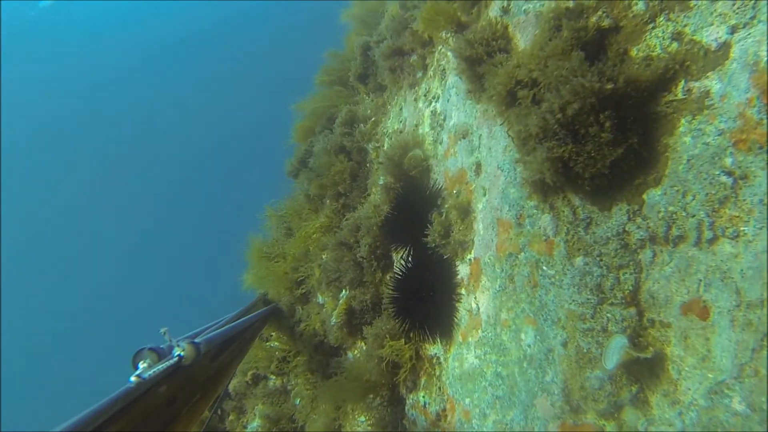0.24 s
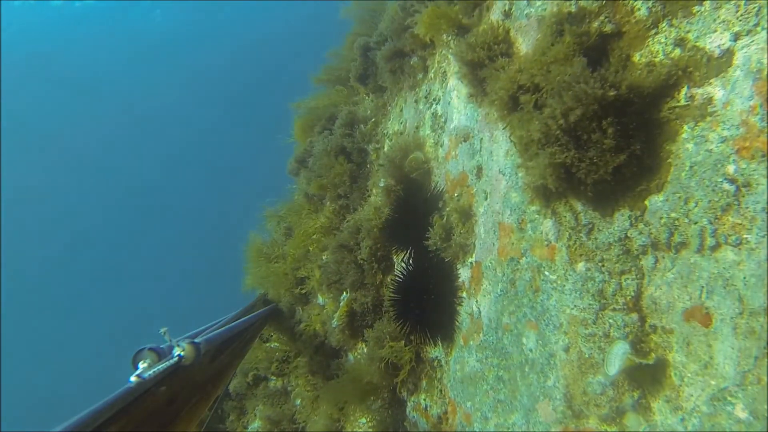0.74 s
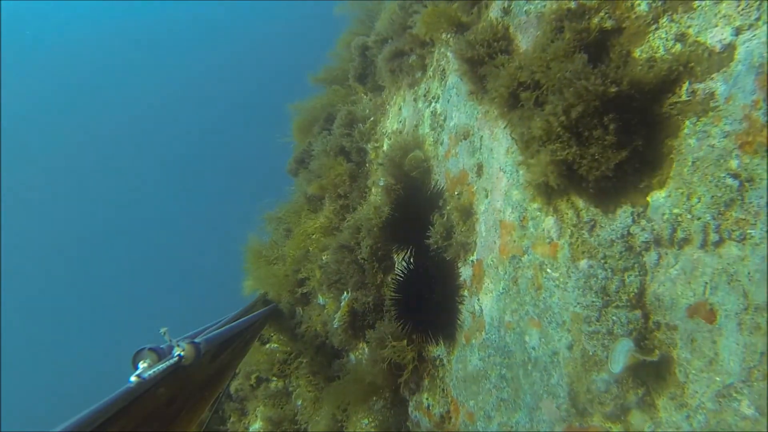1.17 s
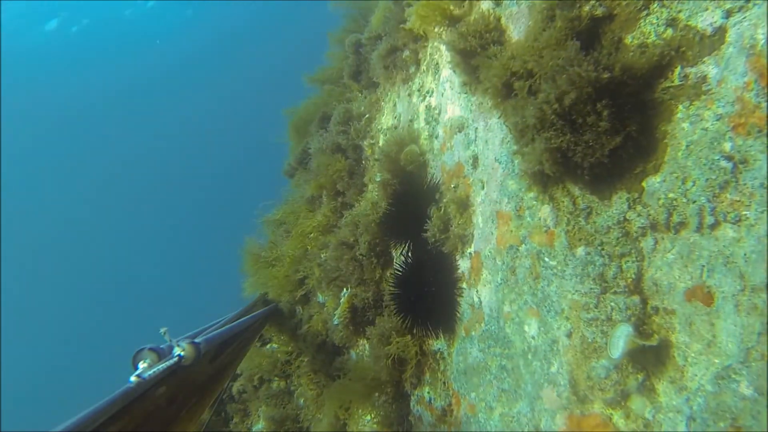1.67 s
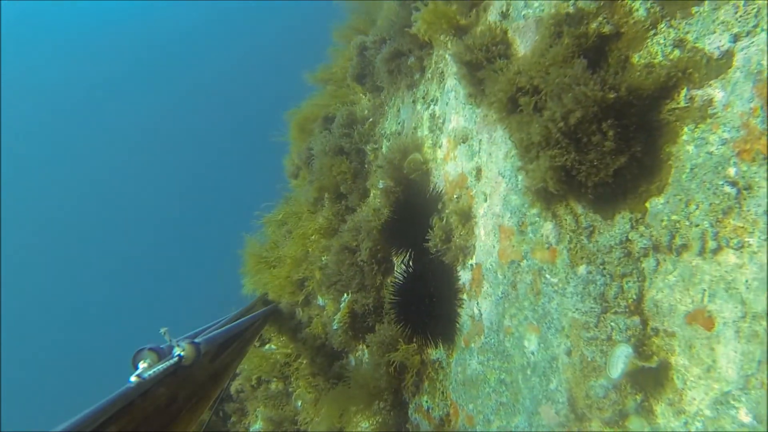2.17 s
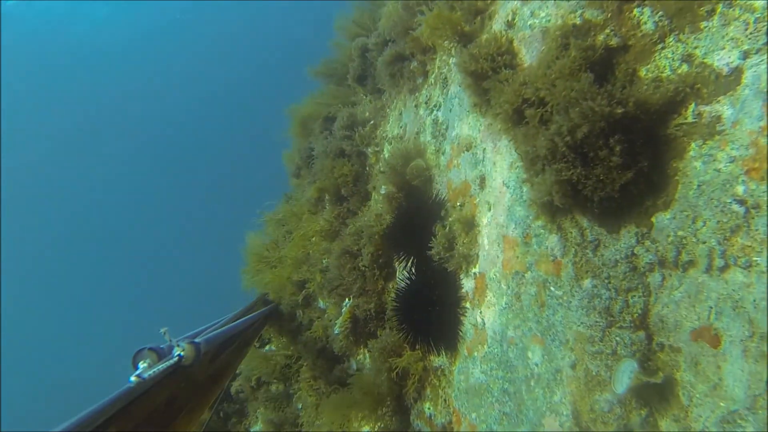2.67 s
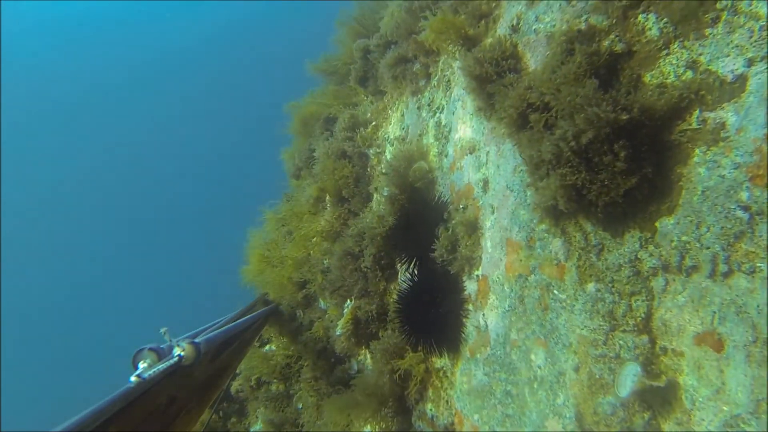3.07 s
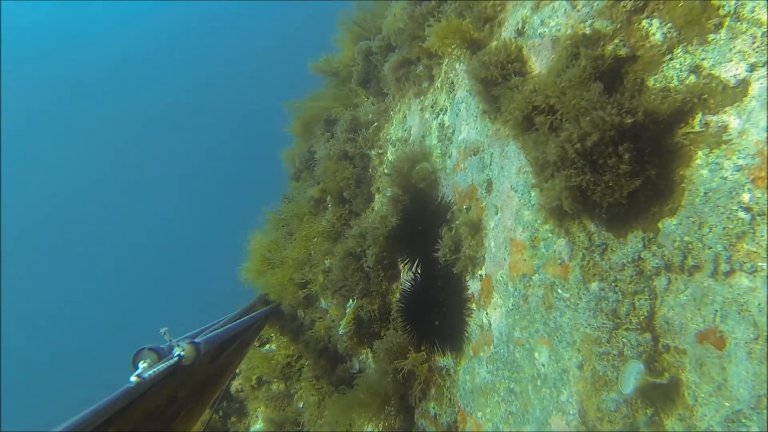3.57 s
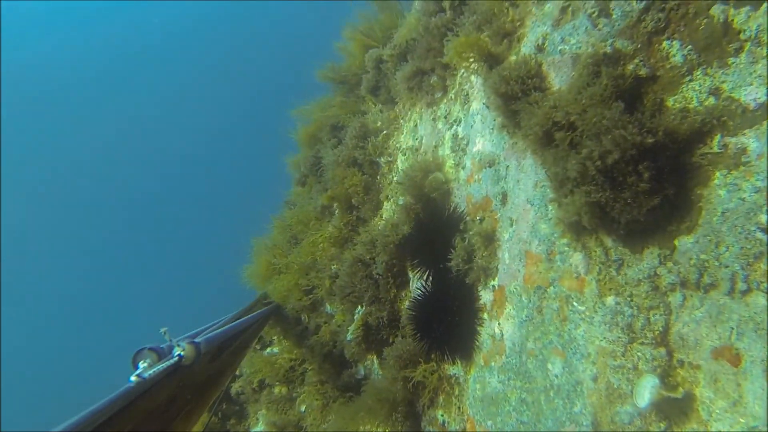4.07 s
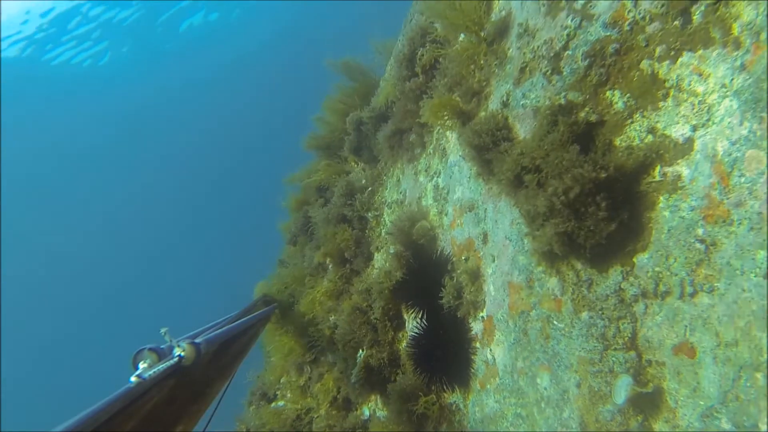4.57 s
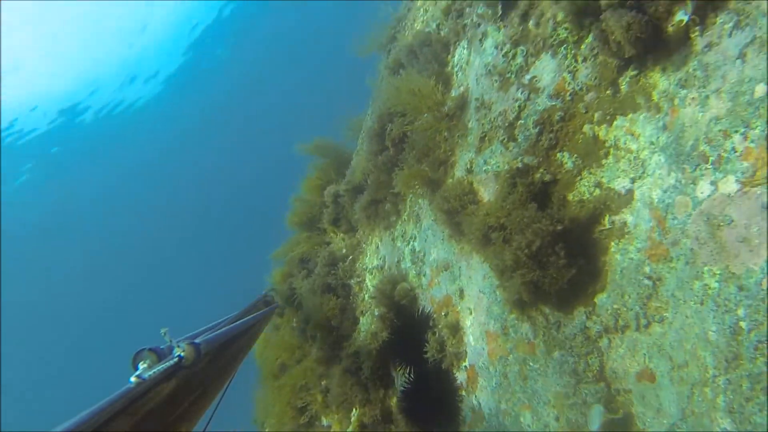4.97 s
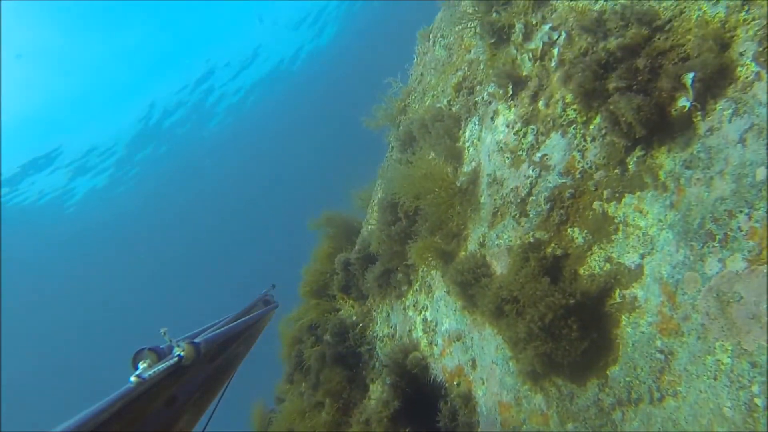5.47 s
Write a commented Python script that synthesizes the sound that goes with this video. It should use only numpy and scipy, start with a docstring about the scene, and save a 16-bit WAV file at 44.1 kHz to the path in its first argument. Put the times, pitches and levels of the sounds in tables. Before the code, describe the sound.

Steady dry crackle of snapping shrimp underwater, with two low thuds on a camera pole and soft deep rumbling as it sways.

```python
"""Snapping shrimp crackle near and far under the sea, the near ones ringing the sealed camera housing.
The housing sits on a long hand-held shaft before a rock wall: snaps are spikes with noise echoes off the rock.
The shaft sways as wandering low sines, and two knocks ring it as decaying sines with a scuff of noise.
Behind lie the sea's wash, filtered noise mostly below 800 Hz, and the microphone's hiss with a faint whistle."""
import sys
import numpy as np
from scipy import signal
from scipy.fft import rfft, irfft, next_fast_len
from scipy.io import wavfile
from scipy.ndimage import uniform_filter1d, map_coordinates

SR = 44100
rng = np.random.default_rng(int(sys.argv[2]) if len(sys.argv) > 2 else 0)


def generate_wav(signal):
    """Clip the signal to [-1, 1] and save it as 16-bit WAV at the path in sys.argv[1]."""
    frames = np.transpose(np.atleast_2d(signal))
    scaled = np.clip(frames, -1, 1) * 32767
    pcm = np.round(scaled).astype(np.int16)
    wavfile.write(sys.argv[1], SR, pcm)


N = 252252

# Near snaps: (time [s], nominal peak [dB], lows [dB re peak], treble [dB re peak], echo [dB])
NEAR_SNAPS = [(0.1007, -42.5, -18, -7, -13), (0.217, -39.5, -28, -24, -4), (0.2523, -26, -17, -24, 1),
              (0.2753, -32.5, -27, -8, 1), (0.3287, -41.5, -20, -7, -13), (0.4407, -25, -23, -21.5, -15),
              (0.5107, -47, -14, -14, 5), (0.5959, -28.5, -22, -8.5, -5.5), (0.6134, -40, -27, 6, -4),
              (0.6877, -34, -27, -23.5, -1), (0.7961, -38.5, -13, -16, 2), (0.8613, -34.5, -27, -14.5, -11),
              (0.9103, -29.5, -20, -22.5, -5.5), (0.9812, -39.5, -25, -18, -3), (1.075, -39.5, -30, -12, 3),
              (1.1129, -37.5, -20, -17, 10), (1.1543, -41.5, -22, -7, 3), (1.1827, -38.5, -19, -10, -3),
              (1.2146, -26, -19.5, -21, -1), (1.3129, -44, -4, -12, -5), (1.3967, -34.5, -19.5, -14, 1.5),
              (1.5085, -35.5, -19, -5, -8), (1.5438, -32, -24, -9.5, -5.5), (1.5893, -37.5, -17, -22, -2),
              (1.6836, -39.5, -34, -14, -11), (1.7255, -44, -14, 19, -13), (1.7572, -44, -36, -8, -25),
              (1.7938, -42.5, -19, -8, -6), (1.8357, -39, -12, -10, -6), (1.8582, -39.5, -13, -16, -1),
              (1.949, -40.5, -19, -16, 0), (1.9764, -38, -15, -21, -5), (2.0462, -42, -22, -5, 10),
              (2.0897, -23.5, -10, -17.5, -5), (2.138, -26.5, -17.5, -23, 0), (2.2314, -42, -15, -5, 3),
              (2.2473, -36, -13, -7, 1), (2.2872, -40.5, -21, -6, -6), (2.3174, -38.5, -23, -5, -24),
              (2.3461, -42.5, -21, -27, -3), (2.4249, -33.5, -21, -1, -6), (2.5267, -40.5, -20, -16, 3),
              (2.6299, -43.5, -17, -11, 3), (2.6399, -39.5, -18, -7, -3), (2.6634, -40, -11, -12, 4),
              (2.6808, -39.5, -25, -10.5, 3), (2.7584, -40.5, -14.5, -11, 1), (2.9796, -31, -36, -14, 1),
              (3.0604, -36, -8, -7, 2), (3.1712, -40, -27, -6, 1), (3.242, -44.5, -15, 10, -16),
              (3.3159, -35, -19, -8, -3), (3.4012, -42.5, -8, -5, 14), (3.4492, -22, -27, -15.5, -7),
              (3.4984, -40.5, -31, -2, -3), (3.5684, -32, -13, -23, -7), (3.5759, -33.5, -30, -17, -2),
              (3.634, -37, -12, -9.5, -8), (3.6641, -37, -14.5, -14.5, 5), (3.71, -43, -13, -17, -2),
              (3.7414, -40, -21, -13, -10), (3.8924, -55, -11, 6, -8), (3.909, -41.5, -29, -11, -16),
              (3.9913, -38, -27, -17, -1), (4.0183, -40, -14, -7, 4), (4.0889, -34.5, -16, -10.5, -3.5),
              (4.2328, -38, -24, -15.5, 1), (4.2557, -36.5, -21, -8, 2), (4.3226, -30.5, -18.5, -12, -3.5),
              (4.3544, -46.5, -14, -2, 8), (4.4598, -38.5, -22, -20, 0.5), (4.559, -36, -23, -17, -1),
              (4.59, -38.5, -22, -10, 4.5), (4.7755, -43, -18, -4, -7), (4.813, -37.5, -26, -14, 8),
              (4.8795, -36.5, -24, -13.5, 10), (4.9134, -35, -30, -17, -5), (4.9437, -39.5, -15, -4, 0),
              (4.9621, -31.5, -16, -10.5, -8), (5.0191, -27.5, -45, -16, -9), (5.0624, -34.5, -26, -14, 3),
              (5.0764, -34, -21, -12, 6), (5.0814, -36, -15, -30, 7), (5.0942, -18.5, -22, -26.5, -13),
              (5.2595, -32.5, -35, -13.5, -14), (5.4051, -41.5, -20, -13, -7), (5.4809, -39, -19, -4, 2),
              (5.537, -39.5, -18, -10, 4), (5.5812, -32, -32, -21, -4), (5.6052, -30, -26, -20, 4.5),
              (5.6331, -37, -24, -22, 2)]
# Bands for lows, body and treble of a snap: (low edge [Hz], high edge [Hz])
SNAP_BANDS = [(1000, 1900), (1900, 4000), (4000, 15000)]
# What the housing passes of a snap: (frequency [Hz], relative density [dB per Hz])
HOUSING_SLOPE = [(320, -31.5), (550, -9.5), (678, 1), (962, -22), (1360, -9), (2070, -7), (2290, -1),
                 (2780, -5.5), (3110, 0.5), (3940, -14.5), (4600, -11), (6890, -21.5), (8040, -20.5),
                 (14300, -32), (15500, -29)]
# Housing modes: (frequency [Hz], width [Hz], height above the slope [dB])
HOUSING_MODES = [(926, 67, 2.5), (1340, 70, 5), (2300, 80, 3), (3060, 120, 1.5), (4460, 200, 2.5)]
# Far shrimp bed: (time [s], level [dB rms])
FAR_BED_LEVEL = [(0.0, -59), (1.23, -56.5), (1.81, -59), (2.18, -56.5), (2.77, -59.5), (3.46, -56),
                 (4.84, -60), (4.95, -57.5), (5.32, -56.5), (5.72, -59.5)]
# Knocks on the shaft: (time [s], blow [dB], hardness: mount and scuff against the blow [dB])
SHAFT_KNOCKS = [(0.513, -6, -16), (2.536, 4.5, -0.5)]
# Bending modes of the shaft: (frequency [Hz], level re blow [dB], t60 [s], signed swing [factor])
SHAFT_MODES = [(21.13, 1, 0.37, 0.35), (62.6, -16.5, 0.335, 1), (86, -18, 0.41, -0.42)]
# Modes of the camera mount: (frequency [Hz], level re blow and hardness [dB], t60 [s])
MOUNT_MODES = [(187, -53, 0.51), (302, -41, 0.16), (406.3, -28, 0.15)]
# Small ticks of the mount: (time [s], level over the first 10 ms [dB rms], centre [Hz])
MOUNT_TICKS = [(.527, -51, 1080), (2.548, -50, 1650), (2.599, -52, 1500), (5.047, -47, 680)]
# The hand rocks the shaft: (time [s], first-mode level [dB], 34 Hz wag level [dB]), before flutter
HAND_SWAY = [(0, -37.5, -51), (.17, -47.5, -58), (.42, -34.5, -46), (.76, -49.5, -57), (1.2, -39, -62),
             (1.35, -46.5, -60), (1.7, -37.5, -63), (1.8, -53, -48), (1.87, -37, -58), (2.2, -55, -57),
             (2.5, -42, -42.5), (2.86, -46, -53), (3.47, -46, -54.5), (4.18, -37, -44), (4.3, -27, -44),
             (4.39, -28.5, -45), (4.44, -38, -55), (4.52, -28.5, -46), (4.64, -42.5, -39),
             (4.73, -28.5, -37), (4.79, -58, -35.5), (4.86, -26, -43), (4.95, -34, -42), (5.11, -25, -44),
             (5.21, -41, -43), (5.37, -26.5, -46), (5.57, -31.5, -41), (5.72, -37, -56)]
# Grip shifts that swell the second mode: (centre [s], length [s], level at the centre [dB rms])
GRIP_SHIFTS = [(0.125, .08, -49), (1.265, 0.12, -47), (1.87, 0.09, -49), (3.66, 0.091, -45.5),
               (4.16, 0.16, -46), (4.676, 0.17, -37.5), (5.04, .28, -42), (5.37, 0.1, -50)]
# Resonances of the rub: (frequency [Hz], width [Hz], height above the slope [dB])
RUB_MODES = [(1270, 200, 24), (1400, 160, 20), (1720, 110, 27)]
# Sea wash: (frequency [Hz], relative density [dB per Hz])
WASH_SLOPE = [(16, -15.5), (28, -5.5), (100, -9.5), (241, -18.5), (346, -17.5), (466, -17), (575, -13.5),
              (658, -14), (720, -16.5), (874, -35), (1000, -37), (1300, -81), (2200, -120)]
# Modes in the wash: (frequency [Hz], width [Hz], height above the slope [dB])
WASH_MODES = [(38.3, 2, 2.5), (86.9, 10.5, 9), (135.8, 4.7, 5.5), (180.6, 8.6, 10), (403, 13.4, 8),
              (470.7, 28, 8.5), (560, 73, -3.5)]
# Microphone self-noise: (frequency [Hz], relative density [dB per Hz])
MIC_HISS = [(1150, 17), (2000, 3.5), (6000, -1), (12000, -0.5), (15000, -8)]
# Electronics, tones 60 Hz apart: (frequency [Hz], level [dB rms])
WHISTLE_TONES = [(13846, -92), (13906, -83), (13966, -93.5)]

BODY_DB = -7.5  # rms of a snap's body under its nominal peak
# lesser snaps: mean values, and spreads for peak and echo (FAINT) or lows and treble (COLOUR)
FAINT_DB, FAINT_LOWS_DB, FAINT_TREBLE_DB, FAINT_ECHO_DB = -51.5, -4.5, -2.5, -5.5
FAINT_SPREAD_DB, COLOUR_SPREAD_DB = 5, 9
WAG_FLUTTER_DB = 2  # unrest of the wag
RUB_S, RUB_LENGTH_S, RUB_DB = 4.76, 0.35, -59  # centre, length, level
TOP_HZ = 15300  # the camera's band limit


def near_snaps():
    """Each snap reaches the housing by its own path, which tilts its colour and favours other modes."""
    rows = np.vstack([NEAR_SNAPS, lesser_snaps(count=60)])
    start_s, peak_db, lows_db, treble_db, echo_db = rows.T
    count = len(start_s)

    # tilt each snap from the housing's usual band balance to its own
    hz = np.fft.rfftfreq(8192, 1 / SR)
    power = amp(2 * shape(HOUSING_SLOPE, HOUSING_MODES, hz))
    usual_db = [10 * np.log10(power[(hz > a) & (hz < b)].sum() / power.sum()) for a, b in SNAP_BANDS]
    body_db = np.full(count, BODY_DB)
    tilt_db = np.transpose([lows_db, body_db, treble_db]) - BODY_DB - usual_db
    centres_hz = [1400, 2750, 5500]

    favour_db = rng.normal(0, 3, (count, len(HOUSING_MODES)))
    modes = [(c, w, db + favour_db[:, [k]]) for k, (c, w, db) in enumerate(HOUSING_MODES)]
    sheen_db = -2.5 - 0.18 * echo_db[:, None]  # echoing paths are duller
    # reflections lift and cancel parts of each snap's treble
    spots_hz = np.geomspace(5000, 15000, 8)
    blotch_db = 4.5 * rng.standard_normal((count, len(spots_hz)))

    def path_db(f):
        tilt = np.array([along(np.c_[centres_hz, row], f) for row in tilt_db])
        sheen = sheen_db * along([(6000, 0), (12000, 1)], f)
        blotches = np.array([np.interp(f, spots_hz, row) for row in blotch_db])
        blotches = blotches * along([(4000, 0), (5500, 1)], f)
        return shape(HOUSING_SLOPE, modes, f) + tilt + sheen + blotches

    snaps = causal(echoes(echo_db, count=6144), path_db)
    body_rms = np.sqrt(np.mean(snaps[:, 88:350] ** 2, axis=1, keepdims=True))  # from the spike on
    snaps = snaps / body_rms
    out = np.zeros(N + SR)
    for start, db, snap in zip(start_s, peak_db, snaps):
        first = round((start - 0.0015) * SR)  # room for the lead-in
        out[first:][:len(snap)] += amp(db + BODY_DB) * snap
    return out[:N]


def lesser_snaps(count):
    """Random rows like NEAR_SNAPS for the many small snaps in between."""
    means = [FAINT_DB, FAINT_LOWS_DB, FAINT_TREBLE_DB, FAINT_ECHO_DB]
    spreads = [FAINT_SPREAD_DB, COLOUR_SPREAD_DB, COLOUR_SPREAD_DB, FAINT_SPREAD_DB]
    levels = means + spreads * rng.standard_normal((count, 4))
    return np.c_[0.002 + rng.random(count) * N / SR, levels]


def echoes(echo_db, count):
    """A claw's weak lead-in, the collapse of its bubble 2 ms later, then lumpy echoes off the rock."""
    rows, t = len(echo_db), np.arange(count) / SR - 0.002  # the collapse is at zero
    knots = rng.standard_normal((rows, count // 64))
    lumps = amp(4.5 * uniform_filter1d(np.repeat(knots, 64, axis=1), size=48, axis=1))
    crack = amp(5 - 60 * np.abs(t) / 0.018)
    build_up = 1 - np.exp(-np.abs(t) / 0.0048)
    tail = amp(echo_db[:, None] - 60 * t / 0.13) * lumps * build_up
    collapse = amp(13.5) * np.exp(-(t * SR / 0.95) ** 2)  # one sharp pressure spike
    lead_in = amp(-10)
    envelope = np.where(t < 0, lead_in, crack + tail)
    drive = collapse + envelope * rng.standard_normal((rows, count))
    # lead-in and echoes carry less treble
    dull = causal(drive, lambda f: along([(4000, 0), (9000, -5)], f))
    fresh = (t > -0.0002) * np.exp(-np.abs(t) / 0.004)
    return fresh * drive + (1 - fresh) * dull


def far_snaps(count=1100):
    """The shrimp bed further off: many weak snaps of scattered size by a dull, a plain and a bright path."""
    t, bed = np.arange(SR // 5) / SR, 0
    # power of a snap: t60 of 13 ms, and 110 ms for its echo
    decay = amp(-120 * t / 0.013) + amp(-8 - 120 * t / 0.11)
    for centre_hz, level_db in [(1500, 3.5), (3000, -4), (7000, 9.5)]:
        place, chance = rng.random((2, count))
        size_db = np.minimum(-6 * np.log(1 - chance), 17)
        clicks = np.bincount((place * N).astype(int), amp(2 * size_db), N)
        power = signal.fftconvolve(clicks, decay)[:N]
        crackle = np.sqrt(np.abs(power)) * rng.standard_normal(N)

        def path_db(f):
            band = level_db - 5 * np.log2((f + 1) / centre_hz) ** 2 - 30 * (f < 900)
            return shape(HOUSING_SLOPE, HOUSING_MODES, f) + band

        bed = bed + causal(crackle, path_db)
    return amp(curves(FAR_BED_LEVEL)[0]) * unit(bed)


def knocks():
    """A blow rings shaft and mount; bending waves run faster the higher they are, so low modes come late."""
    out, t = np.zeros(N + SR), np.arange(SR) / SR

    def ring(hz, db, t60):
        return amp(db - 60 * t / t60) * np.sin(2 * np.pi * hz * t)

    def scuff_db(f):
        return along([(150, 0), (350, -3.5), (1000, -13), (2000, -42)], f)

    for start, blow_db, hard_db in SHAFT_KNOCKS:
        for hz, level, t60, swing in SHAFT_MODES:
            rise = 1 - np.exp(-t / (0.007 + 0.79 / hz))
            arrival = start + 0.082 / np.sqrt(hz)
            out[round(arrival * SR):][:SR] += swing * rise * ring(hz, blow_db + level, t60)
        mount = sum(ring(*mode) for mode in MOUNT_MODES) * (1 - np.exp(-t / 0.014))
        scuff = causal(amp(-60 * t / 0.11) * rng.standard_normal(SR), scuff_db)
        out[round((start + 0.0135) * SR):][:SR] += amp(blow_db + hard_db) * (mount + amp(-19.5) * scuff)
    return out[:N] + mount_ticks()


def mount_ticks():
    """Small ticks of the mount: short puffs of noise around one pitch."""
    out, t = np.zeros(N + SR), np.arange(SR) / SR
    for start, db, hz in MOUNT_TICKS:
        burst = amp(-60 * t / 0.03) * rng.standard_normal(SR)
        puff = causal(burst, lambda f: -45 * np.log2((f + 1) / hz) ** 2)
        out[round(start * SR):][:SR] += amp(db) * puff / np.std(puff[:SR // 100])
    return out[:N]


def sway():
    """Hand tremor keeps the lowest modes swinging, unsteady in pitch and level; a faint rub joins once."""
    rock_db, wag_db = curves(HAND_SWAY)
    rock = amp(rock_db + 2.0 * wobble(15))
    wag = amp(wag_db + WAG_FLUTTER_DB * wobble(3.8))
    grip = sum(amp(db) * swell(centre, length) for centre, length, db in GRIP_SHIFTS)
    second_mode_hz = SHAFT_MODES[1][0]
    swings = [(19.7 + 1.233 * wobble(1.6), rock),
              (34 + 2.57 * wobble(2.3), wag),
              (second_mode_hz + 1.16 * wobble(6), grip)]
    swing = sum(np.sqrt(2) * gain * np.sin(2 * np.pi * np.cumsum(hz) / SR) for hz, gain in swings)
    return swing + rub()


def rub():
    """A faint rub on the shaft: resonant noise in uneven slips, swelling and fading once."""
    slope = [(800, -23), (1500, -20), (2600, -31)]
    noise = causal(rng.standard_normal(N), lambda f: shape(slope, RUB_MODES, f))
    slips = amp(6 * wobble(45))
    return amp(RUB_DB) * swell(RUB_S, RUB_LENGTH_S) * unit(slips * noise)


def wash():
    """Nearly steady sea noise shakes shaft and housing, which favour their modes."""
    drift = amp(0.8 * wobble(3))
    noise = causal(rng.standard_normal(N), lambda f: shape(WASH_SLOPE, WASH_MODES, f))
    return amp(-46.5) * drift * unit(noise)


def electronics():
    """The microphone's self-noise and a thin whistle of steady sines."""
    t = np.arange(N) / SR
    whistle = sum(np.sqrt(2) * amp(db) * np.sin(2 * np.pi * hz * t) for hz, db in WHISTLE_TONES)
    slope = [(600, -59), (900, -7)] + list(MIC_HISS)
    hiss = causal(rng.standard_normal(N), lambda f: along(slope, f))
    return whistle + amp(-67.5) * unit(hiss)


def amp(db):
    """Decibels to amplitude."""
    return 10 ** (np.asarray(db) / 20)


def unit(x):
    """Scale to an rms of one."""
    return x / np.sqrt(np.mean(x ** 2) + 1e-20)


def along(points, hz):
    """Interpolate (frequency [Hz], value) points on a log frequency axis."""
    f, v = np.transpose(points)
    return np.interp(np.log(hz + 1), np.log(f + 1), v)


def curves(rows):
    """One value per sample for each column after the time."""
    s, *cols = np.transpose(rows)
    return [np.interp(np.arange(N) / SR, s, c) for c in cols]


def wobble(rate):
    """A smooth random curve with rate knots a second."""
    knots = rng.standard_normal(int(N * rate / SR) + 4)
    return map_coordinates(knots, [np.arange(N) * rate / SR])


def swell(centre_s, length_s):
    """A smooth rise and fall."""
    return np.exp(-(2 * (np.arange(N) / SR - centre_s) / length_s) ** 2)


def shape(slope, modes, hz):
    """Decibels of a slope with resonance humps on it."""
    return along(slope, hz) + sum(db / (1 + (2 * (hz - c) / w) ** 2) for c, w, db in modes)


def causal(x, db_of):
    """Pass rows of x through the minimum-phase filter of a dB response, which rings only after its cause."""
    m = next_fast_len(x.shape[-1] + 4096)
    cepstrum = irfft(np.log(amp(db_of(np.fft.rfftfreq(m, 1 / SR))) + 1e-6), m)
    # fold the cepstrum onto positive time
    fold = np.r_[1, 2 * np.ones(m // 2 - 1), 1, np.zeros(m - m // 2 - 1)]
    response = np.exp(rfft(cepstrum * fold))
    return irfft(rfft(x, m) * response, m)[..., :x.shape[-1]]


def scene():
    """All sources together at the one microphone."""
    return (near_snaps() + far_snaps() + knocks() + sway() + wash() + electronics())[None]


def record(dry):
    """The camera keeps nothing above its band limit."""
    m = next_fast_len(N + 4096)
    kept = np.fft.rfftfreq(m, 1 / SR) < TOP_HZ
    return irfft(rfft(dry, m) * kept, m)[:, :N]


dry = scene()
out = record(dry)
generate_wav(out)
```